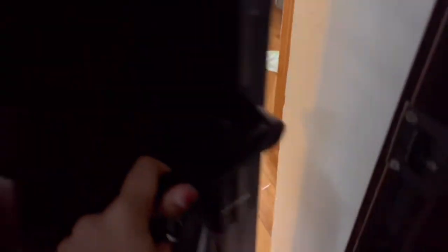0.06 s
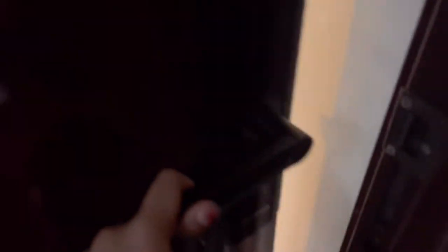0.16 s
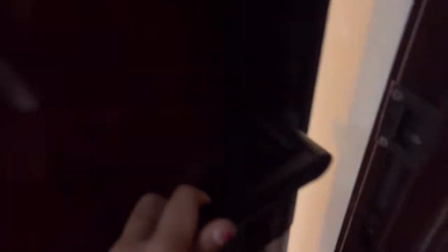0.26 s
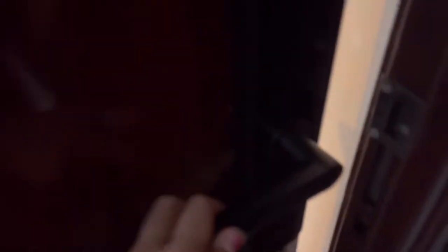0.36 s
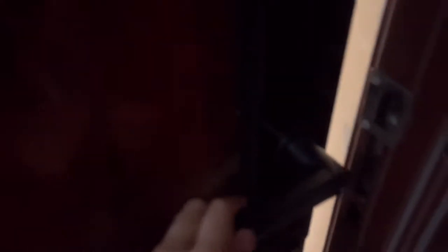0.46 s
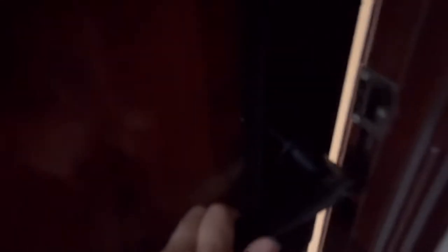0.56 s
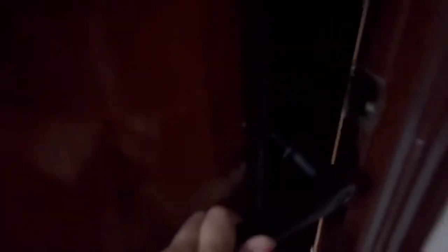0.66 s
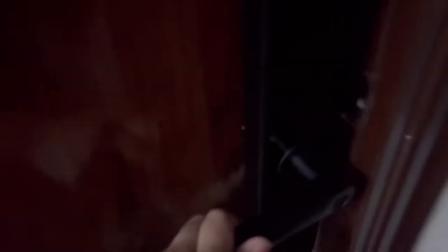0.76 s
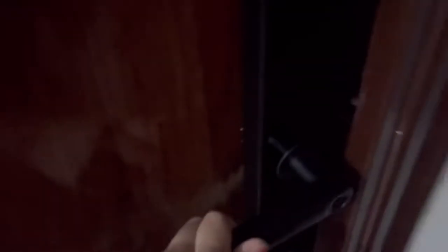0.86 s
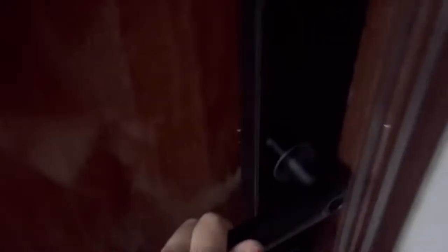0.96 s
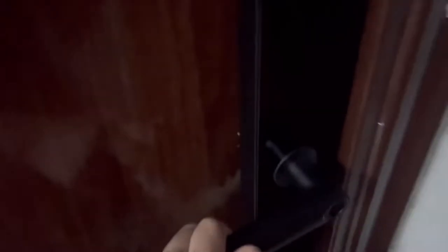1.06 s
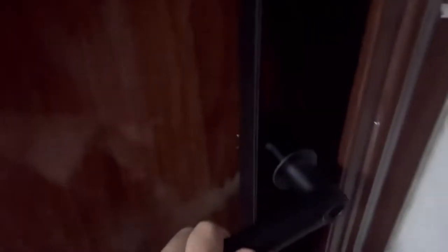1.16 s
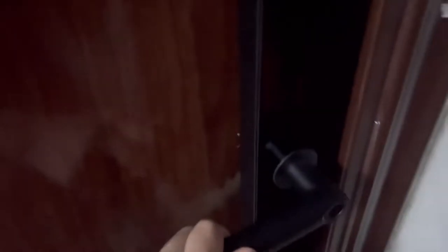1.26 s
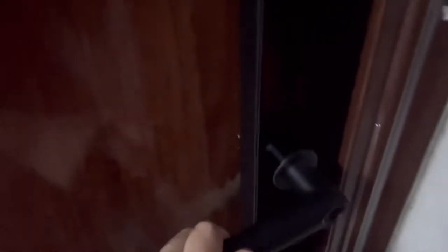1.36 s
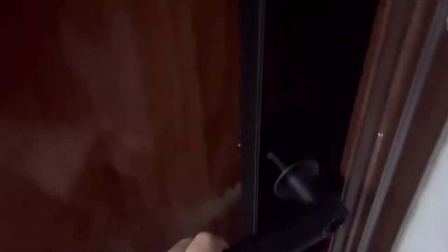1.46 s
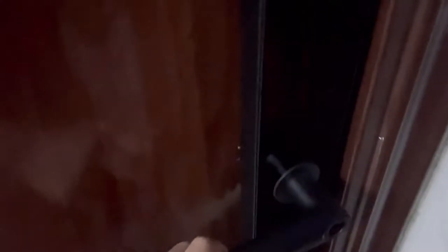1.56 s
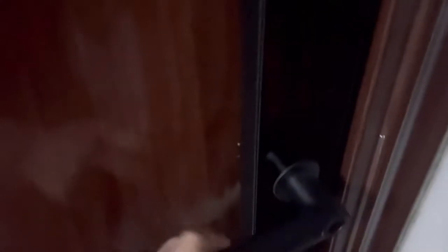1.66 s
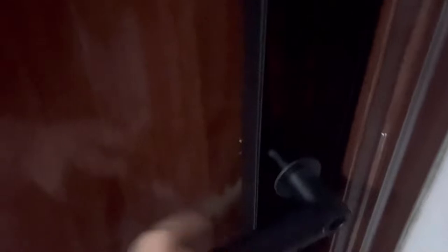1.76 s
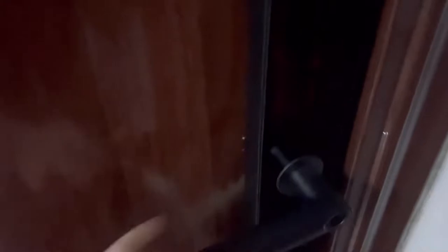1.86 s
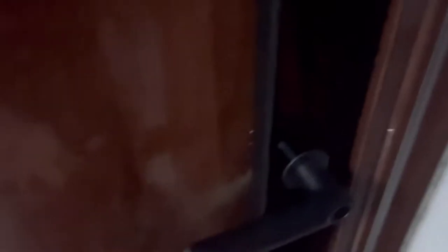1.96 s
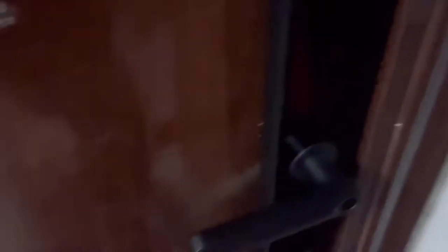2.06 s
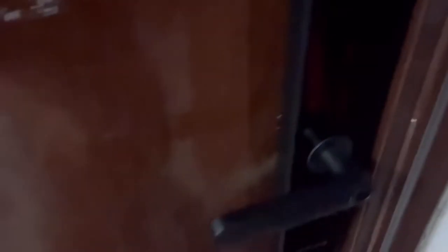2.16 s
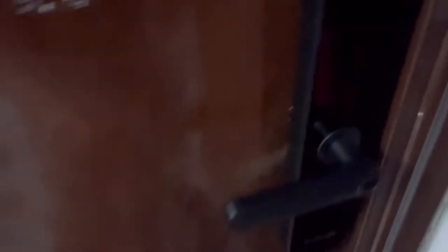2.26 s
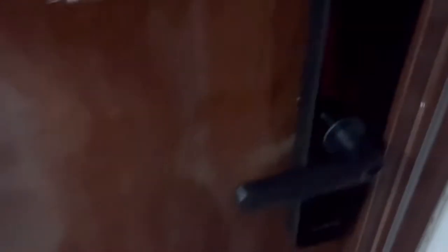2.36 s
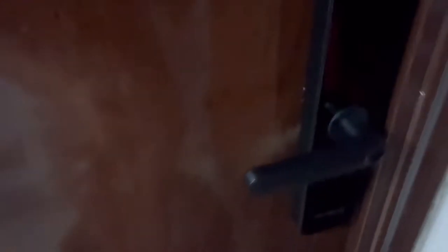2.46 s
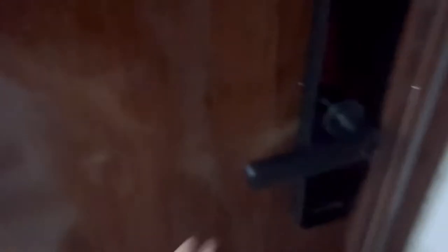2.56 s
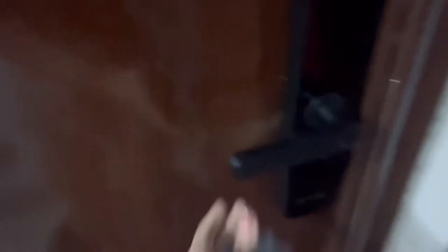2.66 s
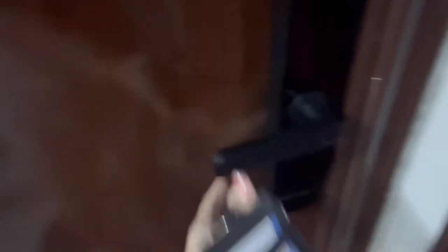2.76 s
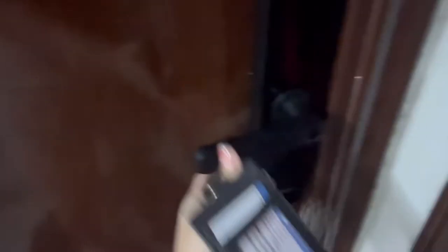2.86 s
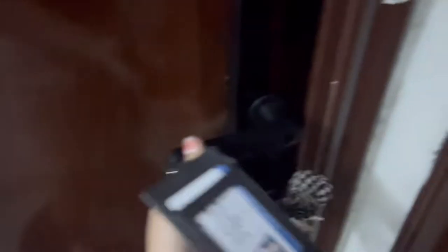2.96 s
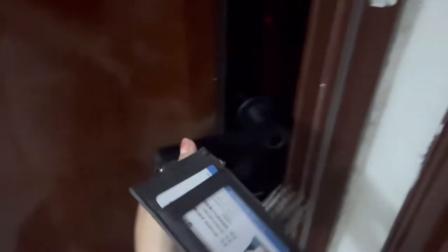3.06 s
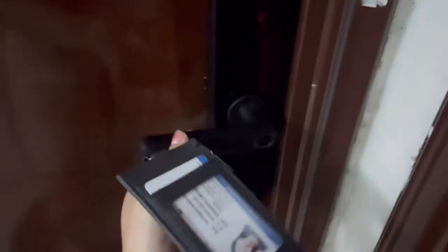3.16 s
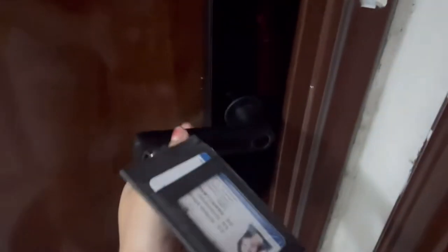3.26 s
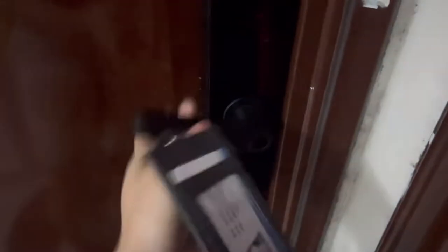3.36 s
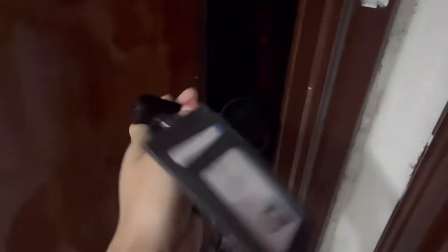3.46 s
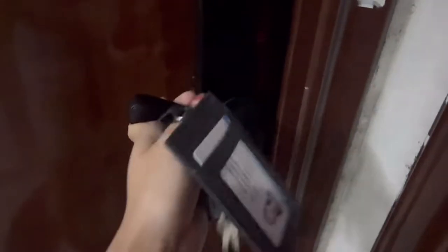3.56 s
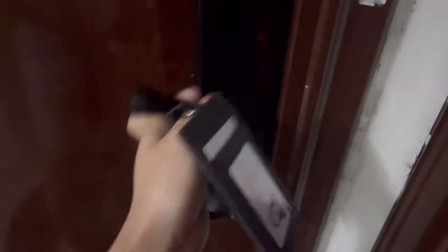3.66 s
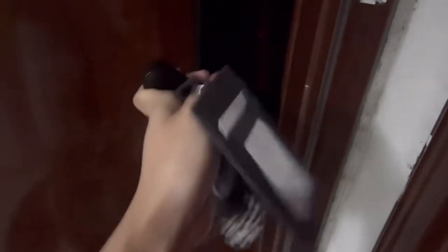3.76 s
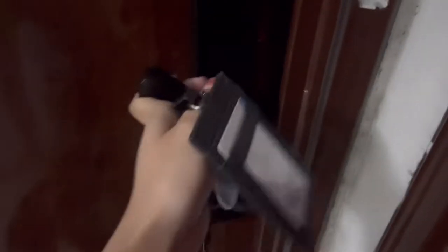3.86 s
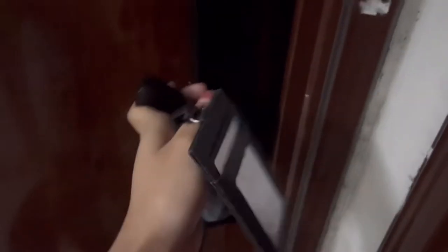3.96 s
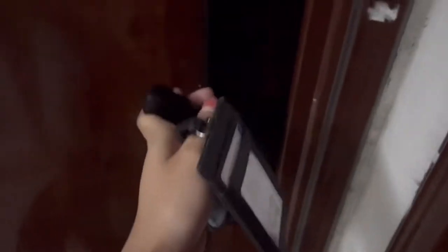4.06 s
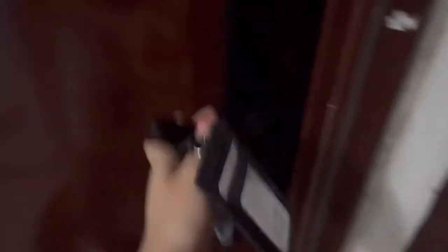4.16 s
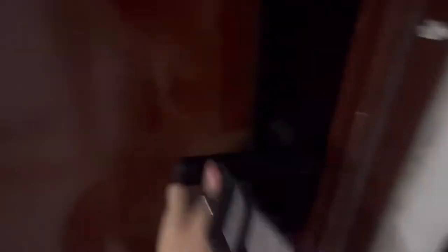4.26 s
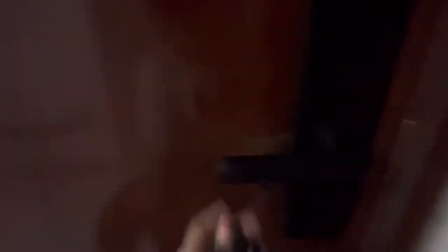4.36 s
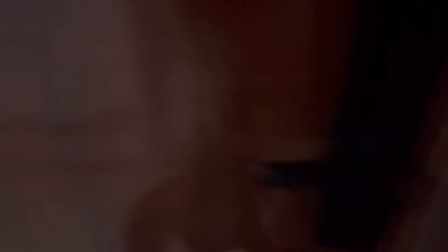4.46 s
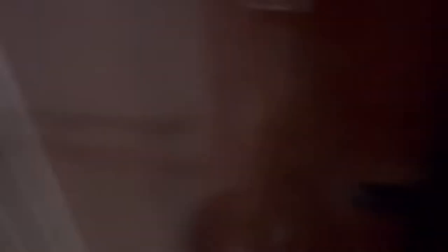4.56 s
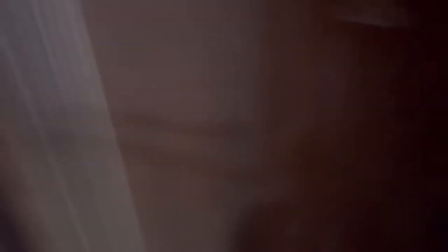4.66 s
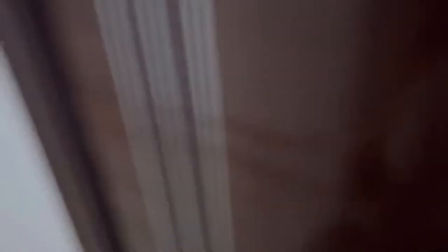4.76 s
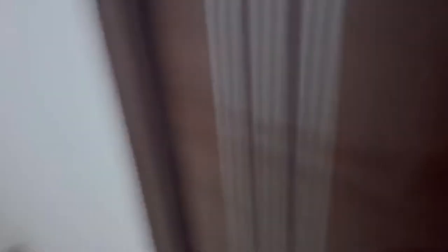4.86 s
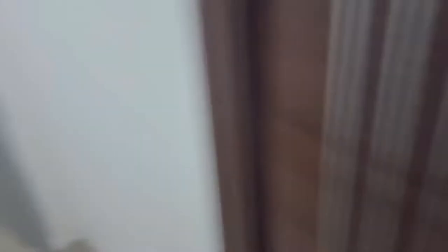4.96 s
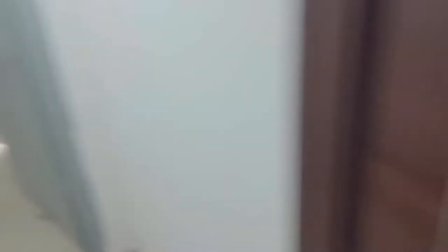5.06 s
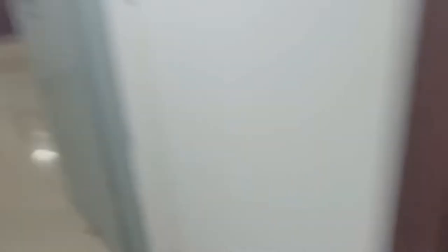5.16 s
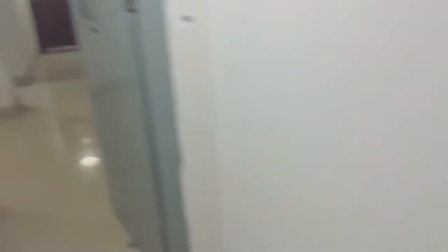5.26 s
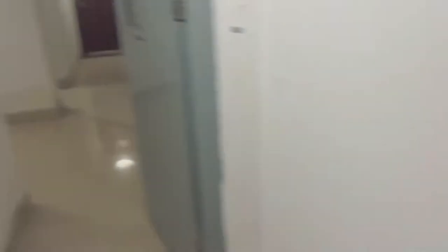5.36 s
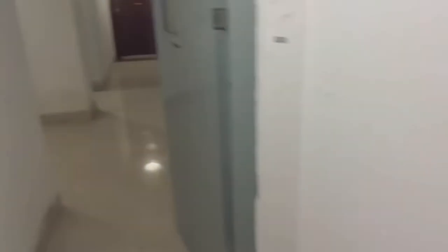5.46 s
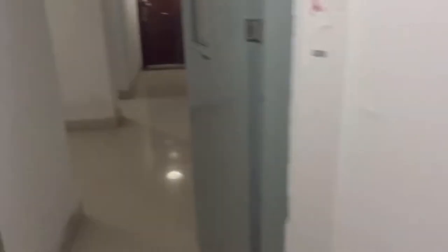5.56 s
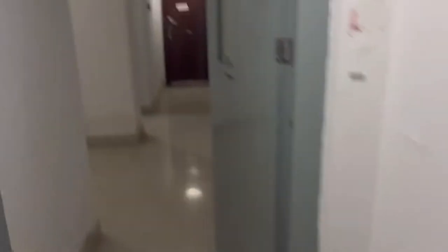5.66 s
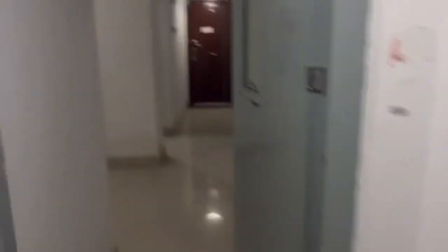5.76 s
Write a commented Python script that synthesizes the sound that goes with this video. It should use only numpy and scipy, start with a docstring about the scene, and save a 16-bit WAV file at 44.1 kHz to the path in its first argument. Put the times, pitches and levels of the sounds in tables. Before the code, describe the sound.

A short hinge squeak, then a wooden door slams shut with a heavy clunk, its handle clicks and rattles twice, and keys tinkle in an echoing hallway.

```python
"""A dull knock and a squeaking hinge open the scene: a wooden door is pulled shut in a bare hallway.
Slipping friction makes the squeak; bursts of contact noise ring the steel of latch and handle, tried twice,
and the boards of the door leaf as it thuds on its frame. Close by, keys tinkle as decaying sines, and clothes
and soles rub as shaped noise. The hallway rings on after every blow over a low building hum."""
import sys
import numpy as np
from scipy import signal
from scipy.io import wavfile

SR = 44100
rng = np.random.default_rng(int(sys.argv[2]) if len(sys.argv) > 2 else 0)


def dump_mix(stems):
    """Bounce the given channels to the path in sys.argv[1] as a 16-bit WAV at rate SR."""
    frames = np.atleast_2d(stems).T  # one column per channel
    limited = np.clip(frames, -1, 1)  # hard clip at full scale
    pcm = np.round(limited * 32767).astype(np.int16)
    wavfile.write(sys.argv[1], SR, pcm)


N = 256220  # samples

# Building hum. Each row: frequency in Hz, relative density in dB per Hz.
HUM_SPECTRUM = [(15, -36), (25, -1), (87, 7.5), (120, -11), (170, 1.5), (256, -7.5), (293, -17), (354, -10),
                (988, -20), (1070, -36), (2160, -23), (3160, -29), (4610, -76.5), (8830, -61),
                (16000, -100)]
# Ring of the bare hallway. Each row: frequency in Hz, t60 in seconds.
HALL_T60 = [(60, 1.45), (250, 1.165), (1000, 1.18), (2500, 0.76), (6000, 1), (12000, 0.22)]
# Likeness of left and right in hum, cloth and hall. Each row: frequency in Hz, likeness from 0 to 1.
STEREO_LIKENESS = [(60, 0.96), (170, 0.94), (300, 0.49), (600, 0.19), (2000, 0.054), (8000, 0.12)]
# Clothes moving close by. Each row: time in seconds, relative level in dB.
RUSTLE_LEVEL = [(0, -49), (.3, -59), (.95, -49.5), (1.75, -73), (2.1, -65), (3.2, -68), (3.7, -52.5),
                (4.1, -56), (4.7, -62), (5.81, -67)]
# Colour of the cloth. Each row: frequency in Hz, relative density in dB per Hz.
CLOTH_SPECTRUM = [(300, -28), (700, 1), (1500, 0), (3000, -4.5), (6000, -6.5), (9000, -16.5), (11000, -24),
                  (16000, -33)]
# Single brushes of a sleeve. Each row: start in seconds, relative level in dB, t60 in seconds.
SLEEVE_BRUSHES = [(2.304, -54, 0.51), (2.45, -63, 0.75), (2.741, -47.5, 0.21), (4.888, -63, 1),
                  (5.107, -47, 0.43), (5.66, -60, 0.82), (5.739, -59, 0.28)]
# A shoe rubs the floor. Each row: start in seconds, relative level in dB.
SOLE_RUBS = [(5.109, -48), (5.645, -48)]
# Keys touching. Each row: start in seconds, relative level in dB, seconds until a hand damps them.
KEY_TOUCH_EVENTS = [(.709, -42, .06), (2.877, -43, .3), (3.484, -47, .2), (4.44, -52, .03),
                    (4.47, -41, .12)]
# The key ring is touched. Each row: start in seconds, relative level in dB, seconds until it is damped.
RING_TOUCH_EVENTS = [(3.585, -57, .05), (3.851, -43, .14), (4.50, -63, .08)]
# Modes of a key. Each row: frequency in Hz, relative level in dB, t60 in seconds.
KEY_MODES = [(7025, -11, .3), (11340, 0, .45), (13400, -9, .3)]
# Mode of the key ring. Each row: frequency in Hz, relative level in dB, t60 in seconds.
KEY_RING_MODES = [(7935, 0, 1.2)]
# Two turns of the hinge, a list of rows each.
# Each row: time in seconds, slips per second, relative level in dB, sharpness in dB per overtone.
HINGE_TURNS = [
    [(.03, 650, -58, 3), (.05, 640, -43, 3), (.075, 628, -36, -1), (.11, 598, -33, -1), (.145, 540, -41, 0),
     (.172, 528, -41, -1), (.19, 595, -36, -3), (.24, 628, -39, -4), (.27, 625, -58, -2),
     (.35, 615, -58, -5)],
    [(.53, 340, -70, -3), (.555, 342, -47, -9), (.60, 346, -50, -9), (.66, 352, -46, -9),
     (.70, 352, -78, -9)],
]
# Colour of the squeak. Each row: frequency in Hz, relative level in dB.
SQUEAK_SPECTRUM = [(300, 0), (600, 0), (1200, 1), (1900, -9), (2500, -16), (4000, -22), (8000, -50)]
# Door leaf knocked against frame or hand.
# Each row: start in seconds, relative level in dB, strongest region in Hz, rattle t60 in seconds.
DOOR_THUDS = [(.002, -23, 188, 0.023), (.125, -30, 328, 0.052), (0.77, -22.5, 333, 0.02),
              (0.856, -26, 296, 0.15), (.989, -10.5, 151, 0.11), (1.01, -7, 139, 0.16),
              (1.064, -10.5, 127, 0.094), (1.078, -25, 51.5, .07), (1.099, -15, 70, .08),
              (1.147, -15.5, 163, 0.058), (1.209, -10, 102, 0.093), (2.876, -44.5, 297, 0.11),
              (3.191, -44, 330, 0.022), (3.338, -25.5, 540, 0.21), (3.383, -23.5, 150, 0.037),
              (3.41, -30, 225, 0.04), (3.649, -24.5, 470, 0.23), (3.698, -17.5, 424, 0.13),
              (3.729, -17, 170, 0.098), (4.21, -23.5, 370, 0.079), (4.239, -23.5, 317, 0.018),
              (4.328, -36, 180, .13)]
# Modes of the door leaf. Each row: frequency in Hz, relative level in dB, t60 in seconds.
DOOR_MODES = [(58.7, -0.5, 0.33), (83, -3, 0.17), (97, -3.5, 0.074), (169.5, -6.5, 0.64),
              (183.6, -1, 0.097), (240.4, 3.5, 0.12), (314.4, 5.5, 0.059), (337, -3, 0.023),
              (396, 4.5, 0.096), (519, -20, 0.017), (600, -2, 0.076), (755, 13.5, 0.017)]
# Sharp metal contacts of latch, handle and card holder.
# Each row: start in seconds, relative level in dB, strongest region in Hz, its spread in octaves,
# relative crack level in dB, rattle t60 in seconds.
METAL_CLICKS = [(0.112, -35, 2350, 0.5, 3.5, 0.073), (0.261, -47, 2720, .5, -16, .022),
                (.29, -43, 2720, 0.57, 11, 0.025), (.410, -41.5, 3250, 0.34, -7, 0.13),
                (.475, -41.5, 3000, 0.35, -18, 0.077), (0.708, -52, 7400, 0.084, -14, .05),
                (0.765, -1.5, 1860, .12, -11, 0.034), (.853, -11, 1726, 0.23, -5.5, 0.027),
                (.986, -23, 970, 0.45, -25, .065), (1.063, -12, 2484, 0.23, 5, 0.085),
                (1.073, -6.5, 2765, 0.21, 8.5, 0.0074), (1.083, -15.5, 4380, 0.22, -10, 0.045),
                (1.86, -33.5, 1264, 0.8, -18.5, 0.053), (1.884, -43.5, 1090, .3, 11, 0.09),
                (2.367, -33.5, 1180, 0.1, 0, .019), (2.582, -30.5, 1400, 0.45, 9.5, 0.011),
                (2.607, -37, 3420, 0.36, -29, 0.0079), (2.799, -50.5, 2900, .5, 13, .029),
                (2.918, -59.5, 5730, 0.29, 16, 0.017), (3.084, -64, 5140, 0.34, -3, 0.013),
                (3.122, -53.5, 3220, 0.36, 5, .02), (3.195, -42.5, 1990, 0.25, -10, 0.036),
                (3.234, -57, 5900, 0.27, -12, 0.006), (3.336, -19, 4810, 0.2, -11, 0.02),
                (3.377, -16.5, 2440, 0.19, -4.5, 0.026), (3.694, 1.5, 2100, 0.11, -26, 0.0082),
                (3.699, -3.5, 990, 0.19, 1.5, 0.067), (3.73, -14, 1000, 0.94, 3.5, 0.07),
                (4.091, -62, 8850, 0.2, -27.5, 0.055), (4.204, -22.5, 2040, 0.37, -13, 0.014),
                (4.278, -45.5, 3300, 0.41, 2, .016), (4.31, -36.5, 1870, 0.42, -6, 0.024),
                (4.671, -44.5, 2700, 0.53, 19, 0.23)]
# The bolt grinds along the strike plate or inside the lock.
# Each row: start in seconds, relative level in dB, strongest region in Hz, rattle t60 in seconds.
BOLT_GRINDS = [(1.078, -19.5, 518, 0.14), (1.092, -44, 2690, 0.27), (3.345, -21.5, 1320, 0.22),
               (3.616, -54, 2080, 0.2), (3.633, -28.5, 1070, 0.22), (3.662, -21.5, 1660, 0.21)]
# Steel modes of the latch. Each row: frequency in Hz, relative level in dB, t60 in seconds.
LATCH_MODES = [(564, 0, 0.027), (1040, -8.5, 0.022), (1209, -7.5, 0.026), (1626, -7.5, 0.0078),
               (2093, 3, 0.0026), (2233, -10, 0.0047), (2708, -6.5, 0.017), (3200, 12.5, 0.0016),
               (4207, -1, 0.017), (4860, 5, 0.0056), (5750, 9.5, 0.0053), (6330, 21, 0.0049),
               (7400, 27, 0.0019), (8400, 22.5, 0.017)]

HUM_DB, CUTOFF_HZ = -48.5, 16700
BRUSH_RISE_S, SOLE_T60_S = 0.017, 0.27
THUD_RISE_SHARE, THUD_SPREAD_OCT = 0.1, 0.63  # rise as a share of the t60
GRIND_RISE_SHARE, GRIND_SPREAD_OCT = 0.11, 0.83  # rise as a share of the t60
LIGHT_RISE_S, HEAVY_RISE_S = 0.00046, 0.00076  # shortest click rise; what a full-scale click adds


def from_db(db):
    """Decibels to amplitude."""
    return 10 ** (np.asarray(db) / 20)


def rms_one(x):
    """Scale to an RMS of 1."""
    return x / np.sqrt(np.mean(x ** 2) + 1e-20)


def energy_one(bursts):
    """Scale every burst, in each channel, to an energy of 1."""
    return bursts / np.sqrt(np.sum(bursts ** 2, axis=2, keepdims=True))


def in_time(rows):
    """Straight lines in time through each column of the rows."""
    s, *columns = np.transpose(rows)
    return [np.interp(np.arange(N) / SR, s, column) for column in columns]


def at_hz(points, hz):
    """Read a (Hz, value) table along a logarithmic frequency axis."""
    table_hz, values = np.transpose(points)
    return np.interp(np.log(hz), np.log(table_hz), values)


def drift(rate_hz):
    """Slow chance: noise through a double one-pole low-pass, spread 1."""
    step = 40  # samples between the slow values
    r = np.exp(-2 * np.pi * rate_hz * step / SR)
    noise = rng.standard_normal(N // step + 2002)
    slow = rms_one(signal.lfilter([1], [1, -2 * r, r * r], noise)[2000:])
    return np.interp(np.arange(N) / step, np.arange(len(slow)), slow)


def band_pass(x, low_hz, high_hz, order=2):
    """Keep one frequency band."""
    return signal.sosfilt(signal.butter(order, [low_hz, high_hz], "band", fs=SR, output="sos"), x)


def bands(shape, size):
    """Half-octave bands of stereo noise, each multiplied by shape(Hz), most alike left and right in the bass."""
    out, edges = 0, 25 * 2 ** np.arange(0, 9.6, 0.5)
    white = rng.standard_normal((2, 2, size))
    for k, (low, high) in enumerate(zip(edges, edges[1:])):
        mid, side = band_pass(white[k % 2], low, high)
        hz = np.sqrt(low * high)
        alike = np.clip(at_hz(STEREO_LIKENESS, hz), -1, 1)
        stereo = np.sqrt(1 + alike) * mid + np.sqrt(1 - alike) * side * [[1], [-1]]
        out = out + shape(hz) * stereo
    return out


def ring(x, hz, t60):
    """Resonance: a unit click sets a sine of height 1 ringing."""
    r, w = from_db(-60 / (t60 * SR)), 2 * np.pi * hz / SR
    return signal.lfilter([0, np.sin(w)], [1, -2 * r * np.cos(w), r * r], x + 1e-18)


def rattles(rises, t60s, channels, size):
    """One burst of contact noise per blow, in uneven grains, swelling and dying in its own time; energy 1."""
    t = np.arange(size) / SR
    swell = 1 - np.exp(-t / np.clip(rises, 0.0001, 0.05)[:, None])
    shape = swell * from_db(-60 * t / np.clip(t60s, 0.002, 0.3)[:, None])
    grain_db = 3.5 * rng.standard_normal((len(t60s), 1, size // 64))
    grains = np.repeat(from_db(grain_db), 64, axis=2)
    noise = rng.standard_normal((len(t60s), channels, size))
    return energy_one(noise * grains * shape[:, None])


def struck(bursts, centre_hz, modes, octaves):
    """Each blow gives its energy mostly to the modes near its strongest region."""
    out = 0
    for hz, level_db, t60 in modes:
        distance = np.abs(np.log2(hz / centre_hz) / octaves)
        share = from_db(level_db) / (1 + distance ** 3)
        out = out + share[:, None, None] * np.sqrt(t60 * SR) * energy_one(ring(bursts, hz, t60))
    return out


def laid_out(times, bursts):
    """Bursts (events x channels x samples) placed at their times."""
    channels, size = bursts.shape[1:]
    out = np.zeros((channels, N + size))
    for s, burst in zip(times, bursts):
        start = round(s * SR)
        out[:, start:start + size] += burst
    return out[:, :N]


def hum():
    """Ventilation and building rumble with microphone hiss: noise in bands, wavering slowly."""
    noise = bands(lambda hz: from_db(at_hz(HUM_SPECTRUM, hz) + 1.5 * drift(3)), N)
    return from_db(HUM_DB) * rms_one(noise)


def hallway(x):
    """Dense reflections build up in a few ms: strong early ones from the doorway, then a tail dying by band."""
    t = np.arange(SR) / SR
    doorway = from_db(9.0 - 60 * t / 0.22)
    build_up = 1 - np.exp(-t / 0.0017)
    tail = bands(lambda hz: from_db(-60 * t / at_hz(HALL_T60, hz)) * (1 + doorway), SR) * build_up
    tail = tail / np.sqrt(np.mean(np.sum(tail ** 2, axis=1)))
    return signal.fftconvolve(x[None], tail, axes=1)[:, :N]


def stroke(s, level_db, t60):
    """Swell and fade of one brush."""
    since = np.maximum(np.arange(N) / SR - s, 0)
    return (1 - np.exp(-since / BRUSH_RISE_S)) * from_db(level_db - 60 * since / t60)


def rustle():
    """Cloth noise in uneven grains: a moving bed and single brushes; soles rub with a duller band."""
    grain = drift(53)
    cloth = rms_one(bands(lambda hz: from_db(at_hz(CLOTH_SPECTRUM, hz) + 1.9 * grain), N))
    rub = rms_one(band_pass(cloth, 1100, 2200))
    cloth_level = from_db(in_time(RUSTLE_LEVEL)[0]) + sum(stroke(*row) for row in SLEEVE_BRUSHES)
    sole_level = sum(stroke(s, level_db, SOLE_T60_S) for s, level_db in SOLE_RUBS)
    return from_db(4.5) * cloth_level * cloth + sole_level * rub


def tinkle(touches, modes):
    """Small free metal parts ring long and thin until they are stopped."""
    out, t = np.zeros(N), np.arange(N) / SR
    for s, touch_db, lasts in touches:
        free = (t >= s) * np.clip((s + lasts - t) / 0.02, 0, 1)  # damped over the last 20 ms
        for hz, mode_db, t60 in modes:
            fade_db = -60 * np.maximum(t - s, 0) / t60
            out += free * from_db(touch_db + mode_db + fade_db) * np.sin(2 * np.pi * hz * (t - s))
    return out


def hinge():
    """Regular slips make a wavering harmonic squeak; sharper slips lift the overtones."""
    out, t = 0, np.arange(N) / SR
    for turn in HINGE_TURNS:
        slips_hz, level_db, sharp_db = in_time(turn)
        sharp_db = np.clip(sharp_db, -9, 7)
        phase = 2 * np.pi * np.cumsum(slips_hz * (1 + 0.007 * drift(40))) / SR
        squeak = 0
        for k in range(1, 6):
            colour_db = at_hz(SQUEAK_SPECTRUM, k * slips_hz) + (k - 1) * sharp_db
            harmonic_db = level_db + colour_db + 3.0 * drift(45)
            squeak = squeak + from_db(harmonic_db) * np.sin(k * phase)
        turning = (t > turn[0][0]) & (t < turn[-1][0])
        out = out + turning * squeak
    return out


def door():
    """The leaf booms in its low modes; long knocks swell in more slowly."""
    s, level_db, centre_hz, t60 = np.transpose(DOOR_THUDS)
    knocks = rattles(THUD_RISE_SHARE * t60, t60, channels=1, size=16384)
    booms = struck(knocks, centre_hz, DOOR_MODES, THUD_SPREAD_OCT)
    sides = from_db([[-0.8], [0.8]])  # slightly stronger on the right
    return laid_out(s, booms * from_db(level_db - 19)[:, None, None]) * sides


def contacts(s, level_db, centre_hz, spread, crack_db, t60, rise):
    """Heavily damped steel modes plus the bright crack; so near, the two sides hear different parts."""
    bursts = rattles(rise, t60, channels=2, size=6144)
    steel = from_db(-10.0) * struck(bursts, centre_hz, LATCH_MODES, spread)
    crack = from_db(crack_db + 13.5)[:, None, None] * band_pass(bursts, 3000, 11500, order=1)
    return laid_out(s, from_db(level_db)[:, None, None] * (steel + crack))


def latch():
    """Clicks start quickly, the light ones fastest; grinds swell in, mostly wider and without a crack."""
    columns = np.transpose(METAL_CLICKS)
    click_rise = LIGHT_RISE_S + HEAVY_RISE_S * np.sqrt(from_db(columns[1]))
    clicks = contacts(*columns, click_rise)
    s, level_db, centre_hz, t60 = np.transpose(BOLT_GRINDS)
    no_crack = np.full_like(s, -np.inf)
    grinds = contacts(s, level_db, centre_hz, GRIND_SPREAD_OCT, no_crack, t60, GRIND_RISE_SHARE * t60)
    return clicks + grinds


def scene():
    """Near sources straight to the microphone, their share sent down the hallway, cloth and hum around them."""
    metal, wood, squeak = latch(), door(), hinge()
    keys = tinkle(KEY_TOUCH_EVENTS, KEY_MODES) + tinkle(RING_TOUCH_EVENTS, KEY_RING_MODES)
    direct = metal + wood + from_db(0.5) * squeak + keys
    sent = from_db(-3.5) * metal[0] + from_db(-5) * wood.mean(0)
    sent = sent + from_db(-2.5) * squeak + from_db(1) * keys
    return direct + hallway(sent) + rustle() + hum()


def record(dry):
    """Subsonic rumble is cut, the loudest peaks are rounded, the top is cut."""
    dry = signal.sosfilt(signal.butter(3, 36, "high", fs=SR, output="sos"), dry)
    dry = 0.9 * np.tanh(dry / 0.9)
    return signal.sosfilt(signal.cheby2(12, 70, CUTOFF_HZ, fs=SR, output="sos"), dry)


dry = scene()
out = record(dry)
dump_mix(out)
```